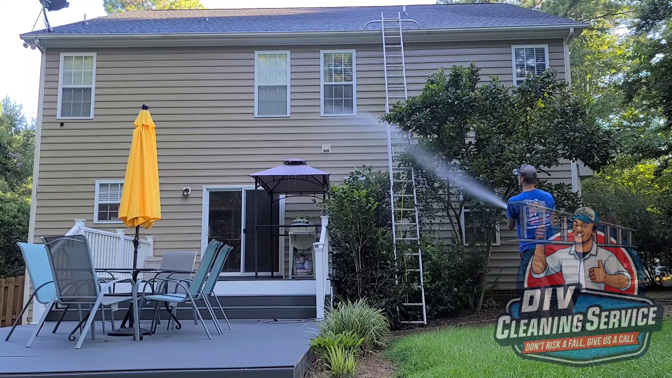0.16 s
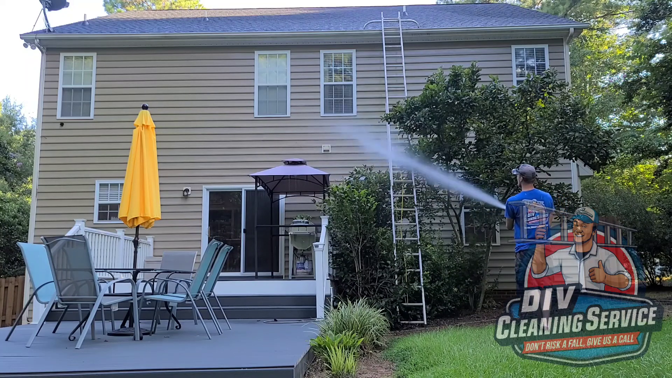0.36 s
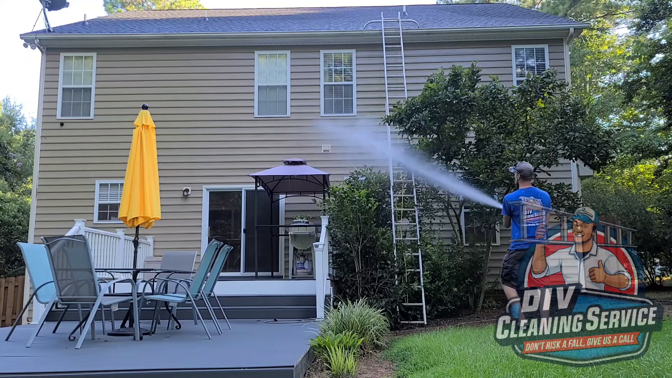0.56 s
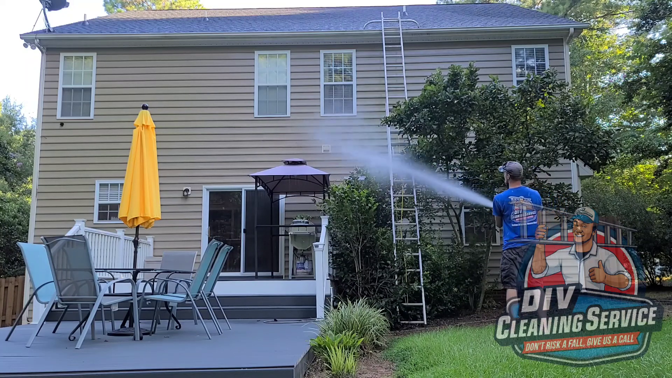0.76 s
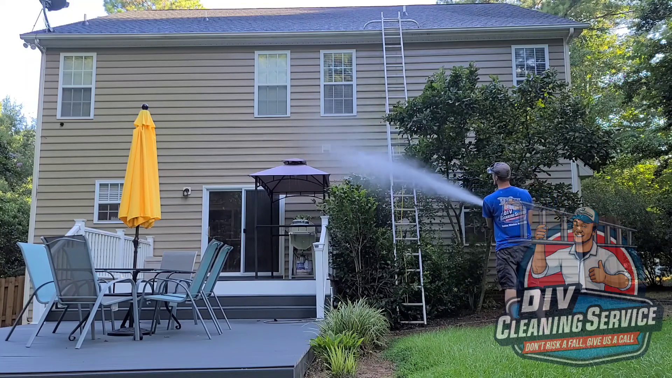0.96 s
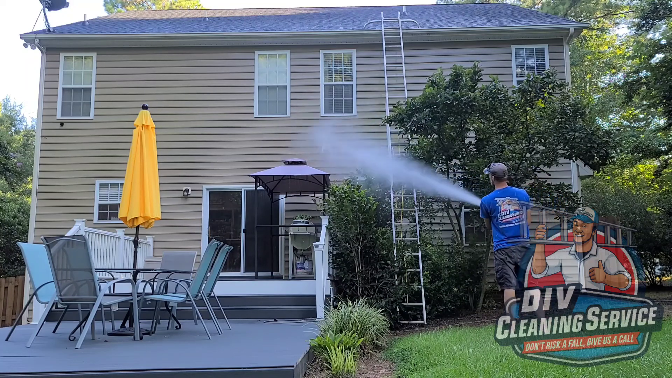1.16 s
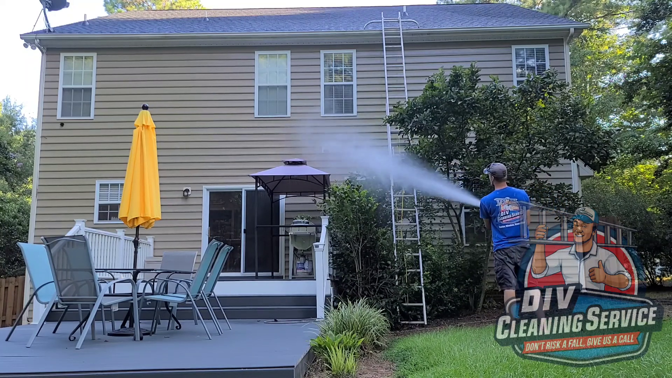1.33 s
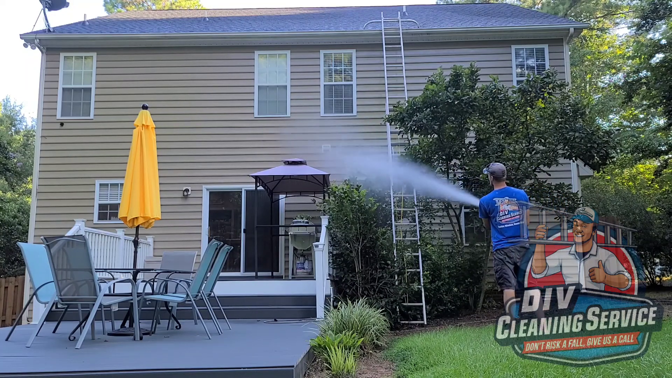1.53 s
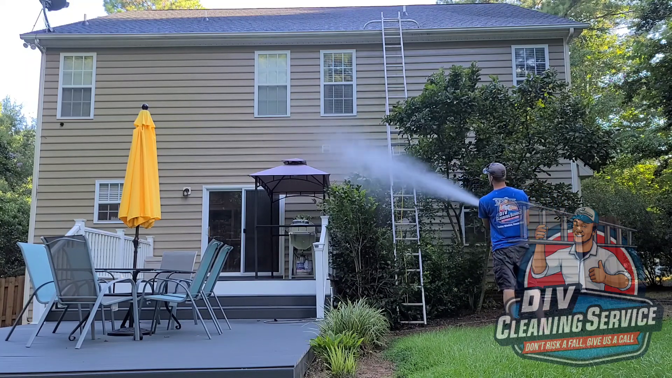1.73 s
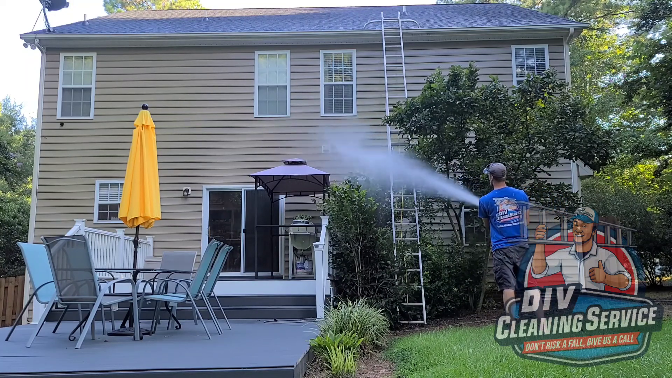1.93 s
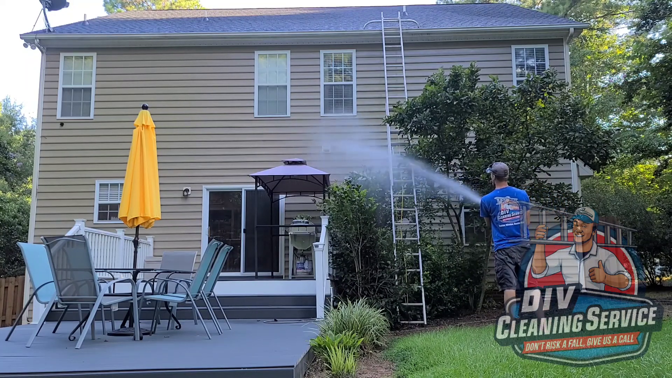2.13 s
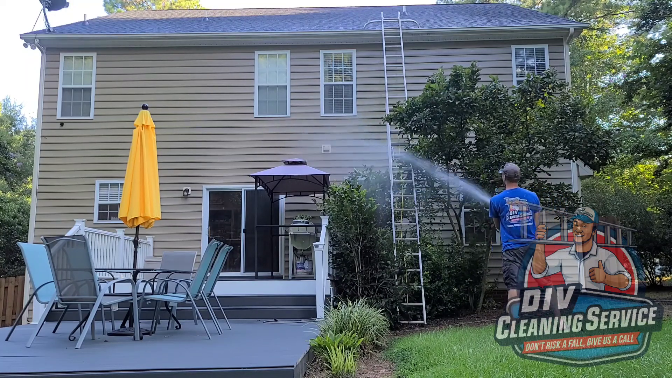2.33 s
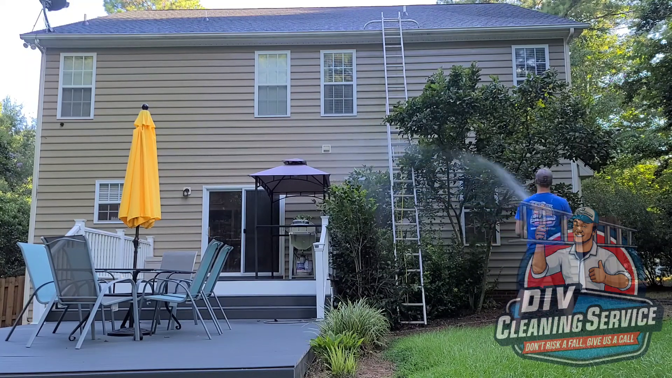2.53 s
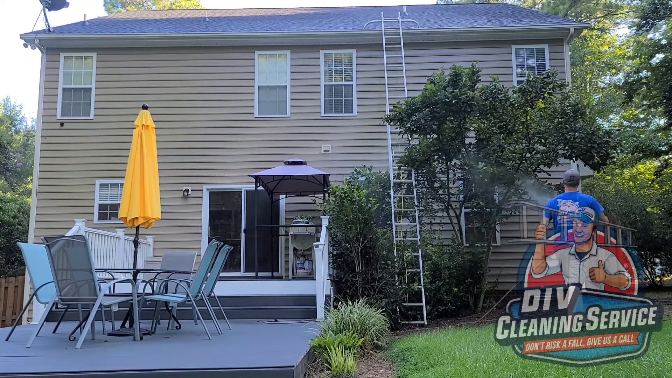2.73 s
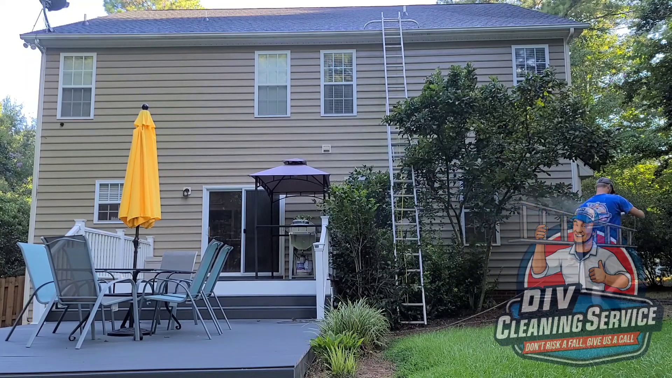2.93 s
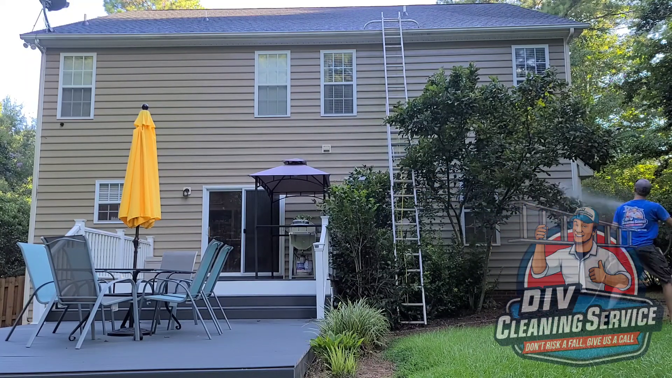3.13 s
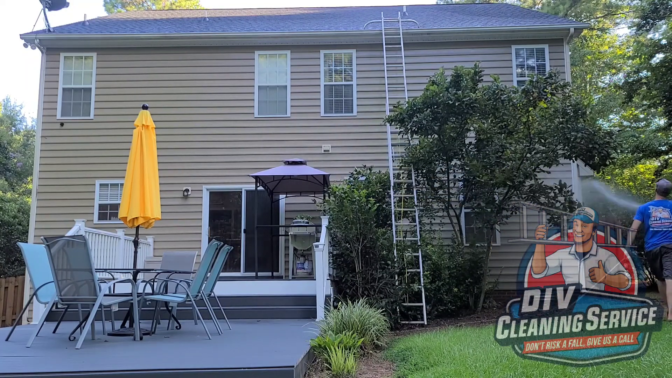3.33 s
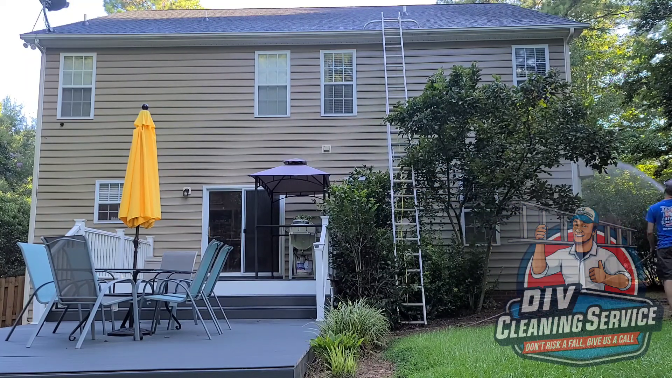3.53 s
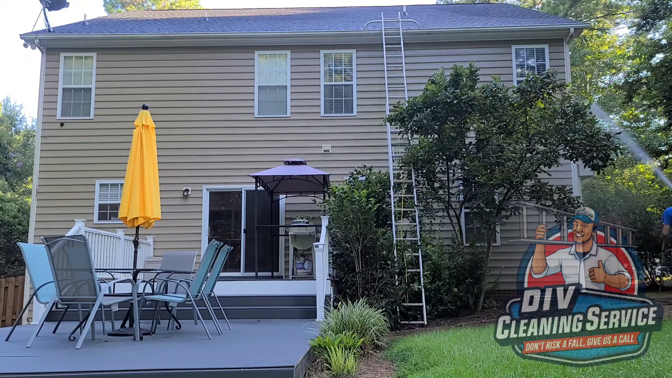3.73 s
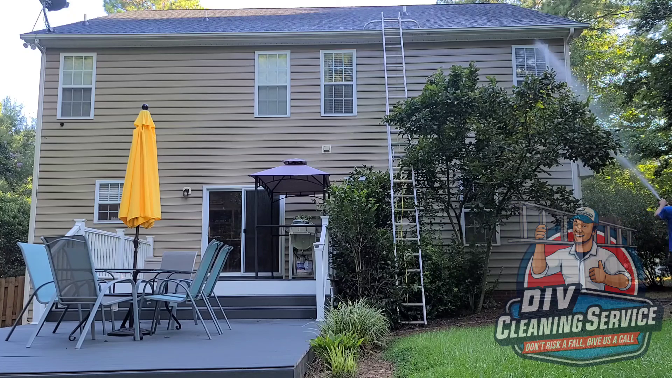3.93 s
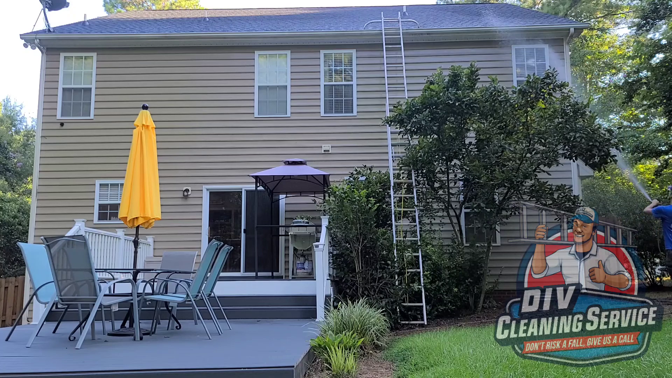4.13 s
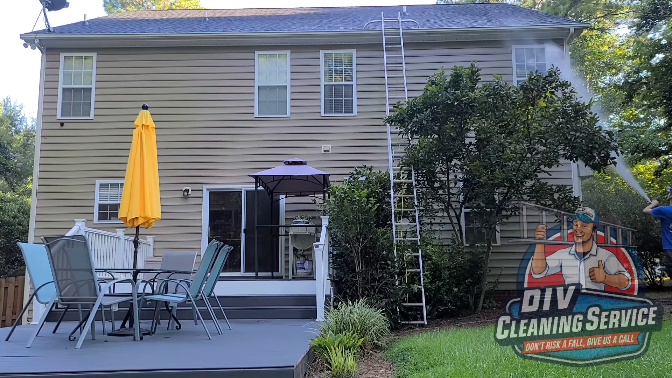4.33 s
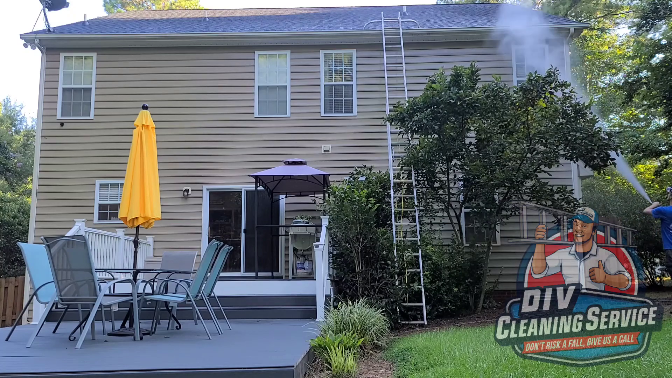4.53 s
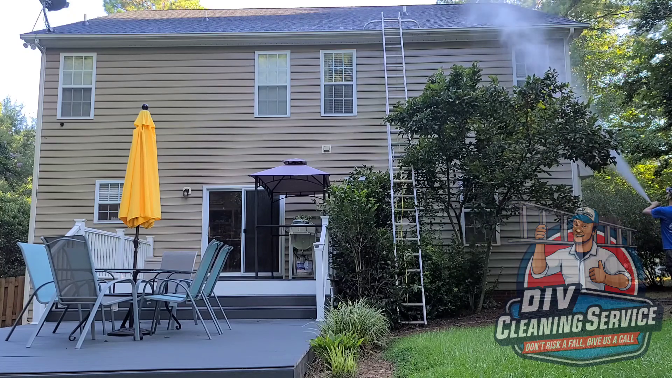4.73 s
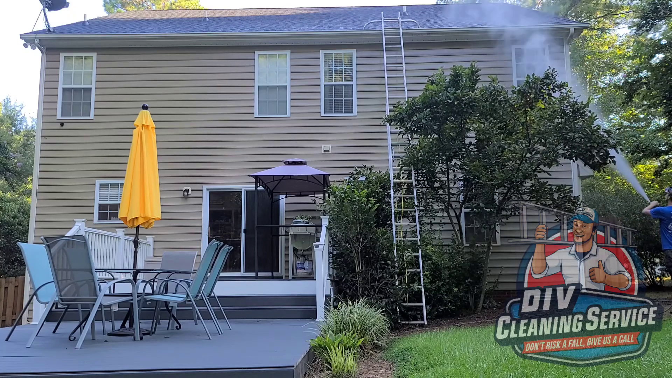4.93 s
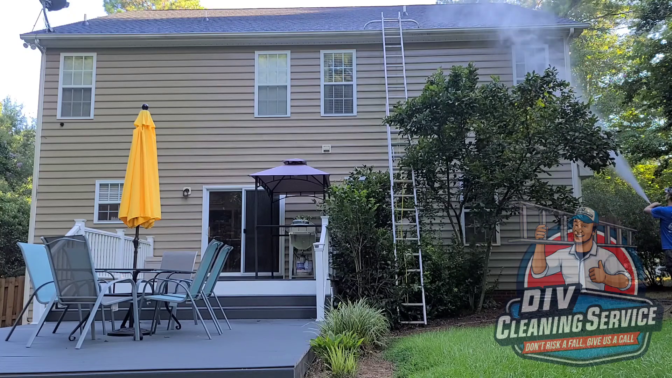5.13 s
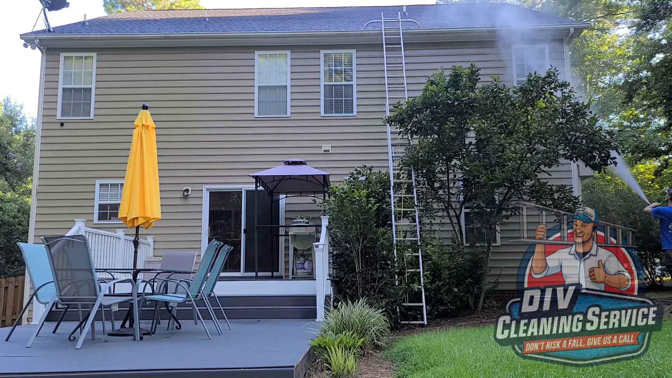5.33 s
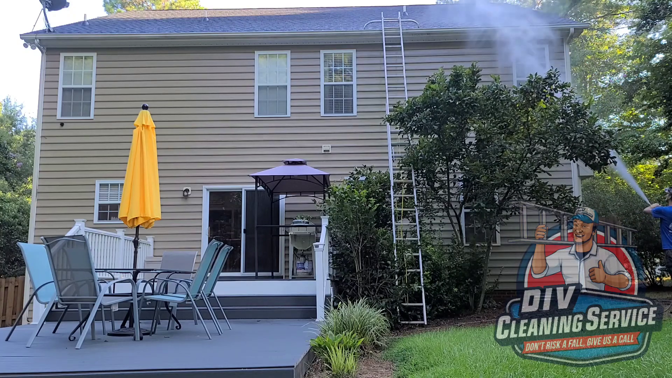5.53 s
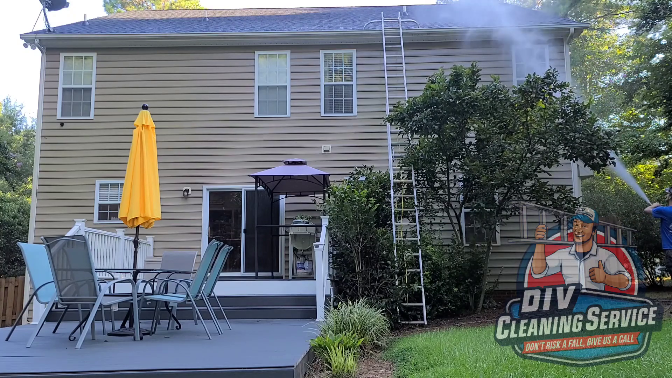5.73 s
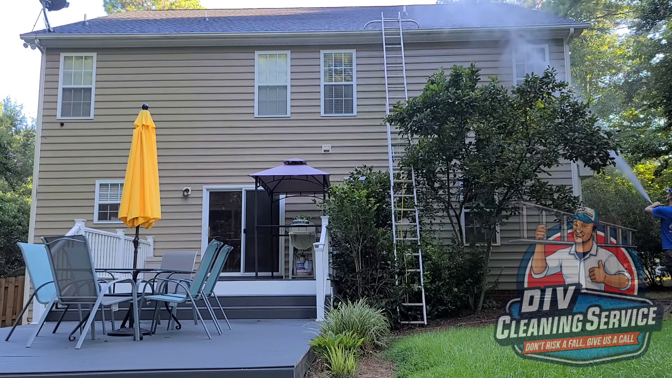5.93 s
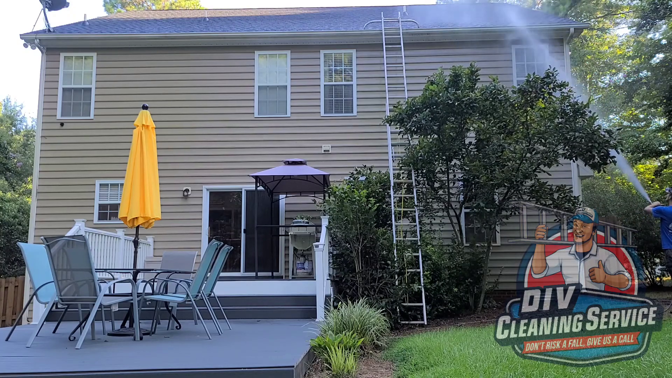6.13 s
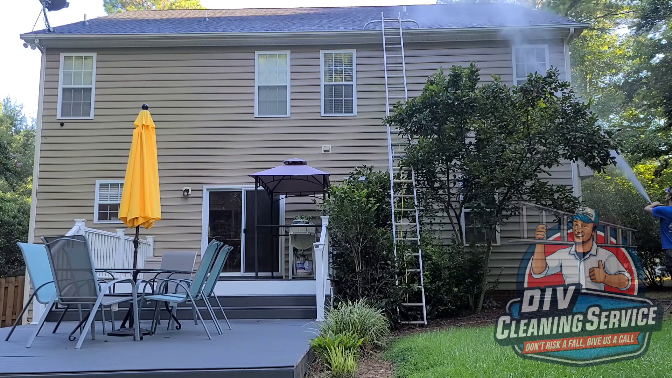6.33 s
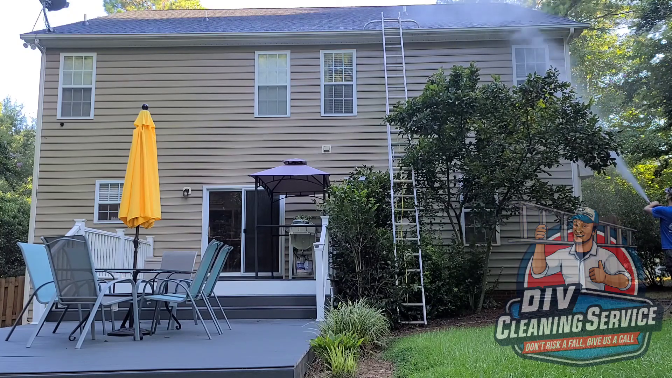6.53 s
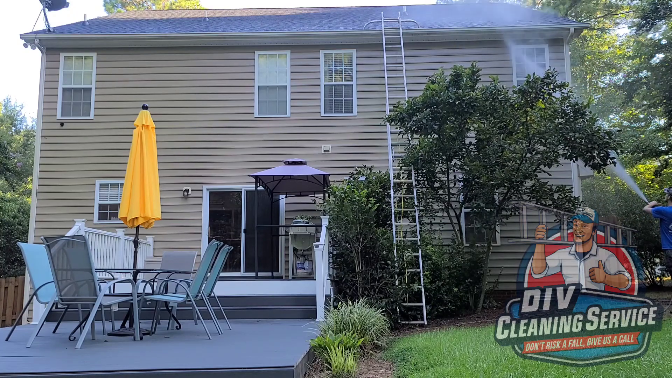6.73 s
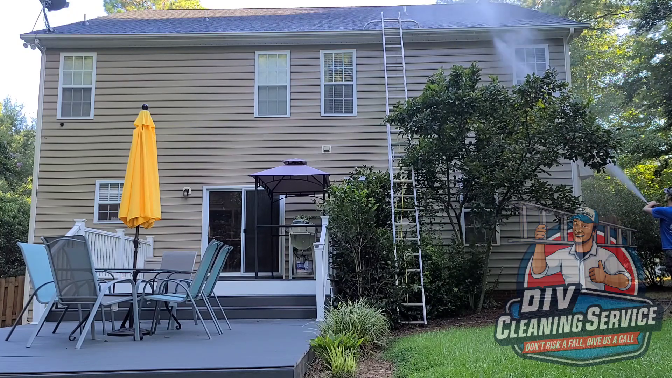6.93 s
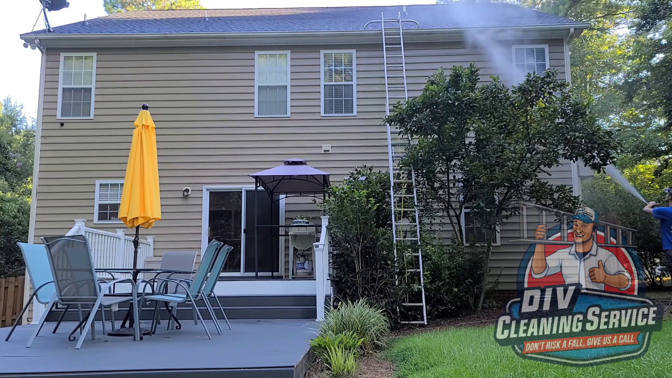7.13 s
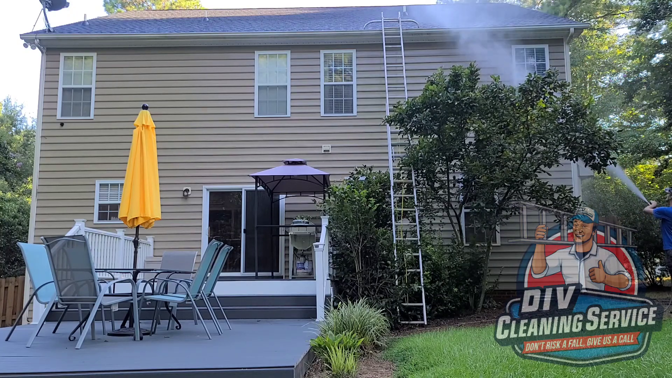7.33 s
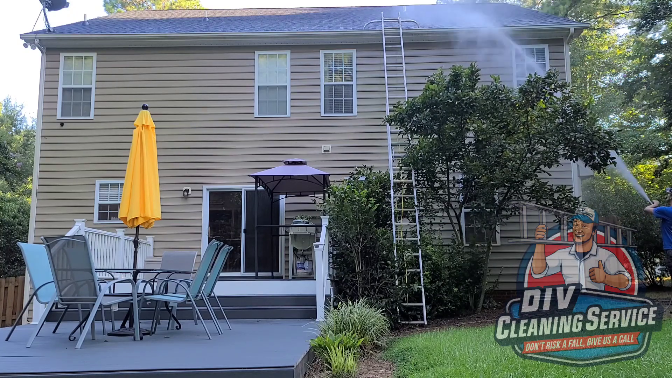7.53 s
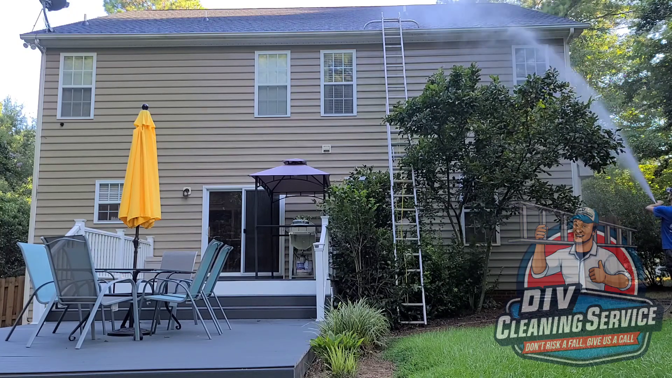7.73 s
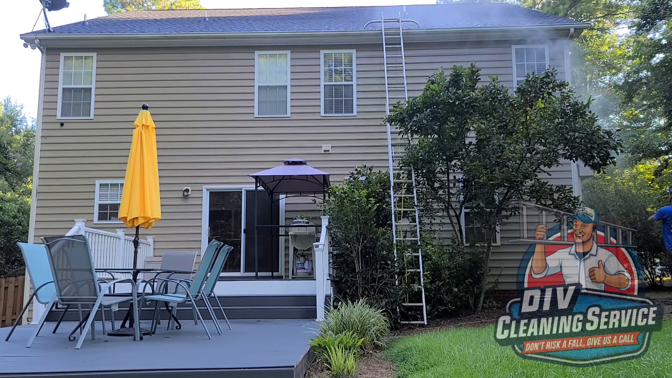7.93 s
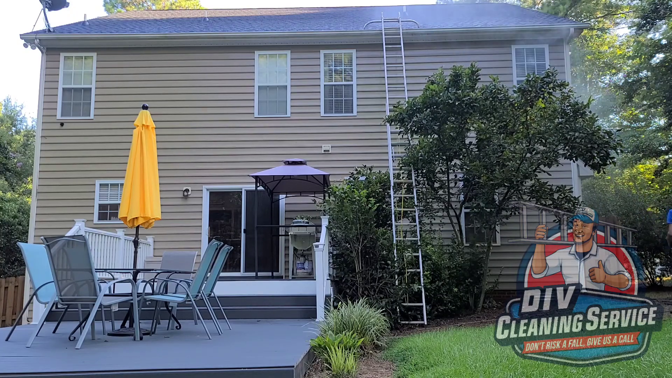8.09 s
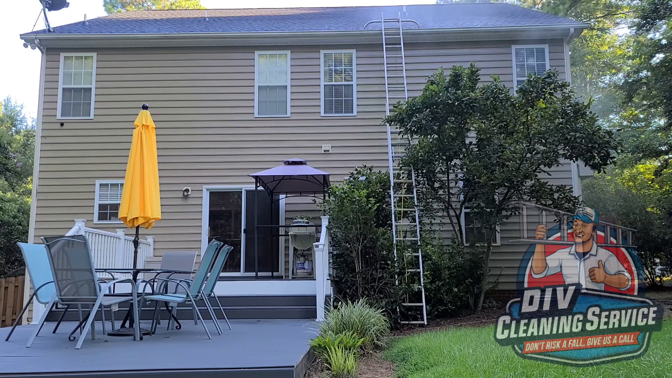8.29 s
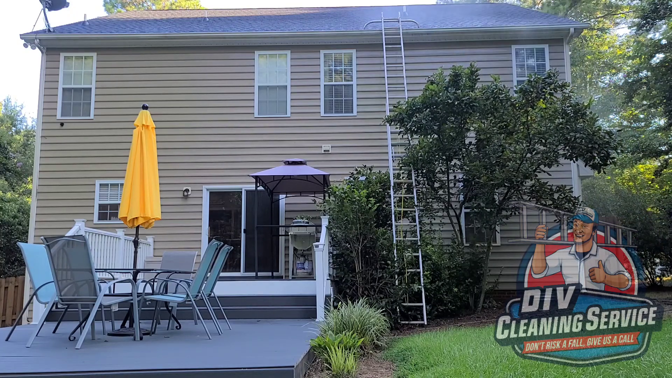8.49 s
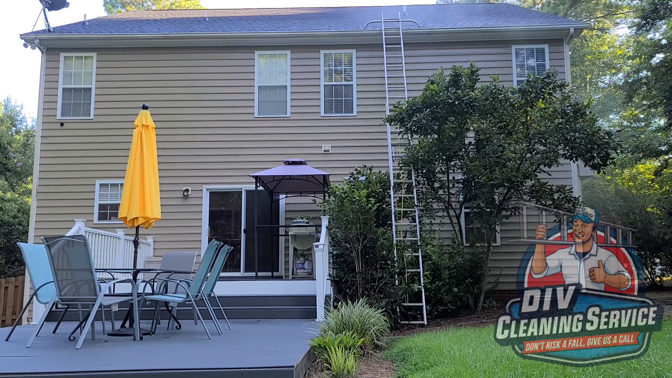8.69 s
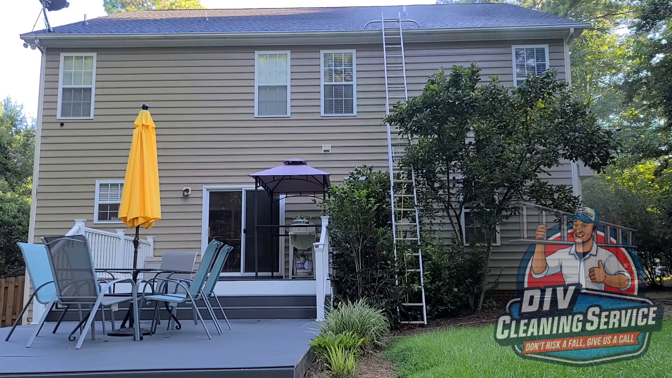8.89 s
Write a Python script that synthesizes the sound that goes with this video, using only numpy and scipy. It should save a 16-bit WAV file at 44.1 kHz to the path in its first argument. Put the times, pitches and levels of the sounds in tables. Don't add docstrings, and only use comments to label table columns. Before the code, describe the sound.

An open backyard, heard by a fixed small stereo camera several metres away. From 0 s a pressure washer jet rushes against house siding: wide-band watery roar, boxy board drumming, hollow splash and fine hiss, with quick fluttering. It brightens and swells around 1.1 to 2 s, then falls sharply. From 2.1 to 4 s the weaker stream comes in short uneven swishes through foliage while the source moves right. At about 4.3 s it surges to its loudest, booming and hissing at the gutter, dips near 4.9 s, swells again around 5.4 s, then holds slightly softer from 5.7 s. At 7.8 s it cuts off abruptly with a short dull yard echo. A low wavering engine drone, distant rumble and passing hums lie beneath throughout. The quiet ending reveals faint shrill insects, light patter and tiny drop ticks near 8.1, 8.3 and 8.7 s.

```python
import sys
import numpy as np
from scipy import signal
from scipy.fft import rfft, irfft, next_fast_len
from scipy.io import wavfile
from scipy.ndimage import uniform_filter1d, map_coordinates

SR = 44100
rng = np.random.default_rng(int(sys.argv[2]) if len(sys.argv) > 2 else 0)


def magnitude_from_level(level_db):
    exponent = np.asarray(level_db, float) / 20
    return 10 ** exponent


def digitize_waveform(pressure):
    field = np.atleast_2d(pressure).T
    bounded = np.clip(field, -1, 1)
    quanta = np.round(bounded * 32767).astype(np.int16)
    wavfile.write(sys.argv[1], SR, quanta)


N = 399310


def curves(rows, s):
    t, *cols = np.transpose(rows)
    return [np.interp(s, t, c) for c in cols]


def bumps(rows, s):
    mid, half, *cols = np.transpose(rows)
    bell = np.exp(-((s[:, None] - mid) / half) ** 2)
    return [bell @ c for c in cols]


def along(points, hz):
    f, *cols = np.transpose(points)
    return np.array([np.interp(np.log(hz + 1), np.log(f), c) for c in cols])


def unit(x):
    return x / np.sqrt(np.mean(np.abs(x) ** 2))


def wobble(rate_hz, s):
    knots = rng.standard_normal(int(N * rate_hz / SR) + 8)
    return map_coordinates(knots, [s * rate_hz])


def layer(colour, hz, level_db):
    shape = magnitude_from_level(along(colour, hz)) ** 2
    return (shape / shape.mean())[:, :, None] * magnitude_from_level(level_db) ** 2


FRAME, HOP = 512, 256
# pitch_hz, ahead_rad, far_right_rad
TRAIL = [(20, -1.5, 0.5), (467, 0.6, -0.7), (980, 0, 1.5), (1920, 1.0, 2.5), (2340, 0.5, 2.5), (2840, 2, 4),
         (4400, 4, 5.4), (5050, 3, 7), (6170, 4, 9.5), (7700, 5, 10.5), (10560, 8, 17), (10500, 10, 13),
         (12700, 12.5, 19), (16000, 7, 21.5)]


def ports(power, alike, place, patchy_db, spatter_db=0.):
    s = np.arange(N) / SR
    white = rng.standard_normal((3, N)) * magnitude_from_level(spatter_db * wobble(700, s))
    hz, s, (both, left, right) = signal.stft(white, SR, nperseg=FRAME, noverlap=FRAME - HOP)
    aside, scatter = place(s)
    near, far = np.clip(along(alike, hz), .01, 1)[:, :, None]
    reach = np.clip(hz[:, None] / 2500, 0, 1) ** 2
    share = near + np.clip(aside, 0, 1) * (far - near)
    share = share ** (1 + reach * (scatter - 1))
    ahead, far_right = along(TRAIL, hz)[:, :, None]
    late = np.exp(-1j * (ahead + aside * (far_right - ahead)))
    common = np.sqrt(share) * np.array([both * late, both])
    pair = common + np.sqrt(1 - share) * np.array([left, right])
    field = uniform_filter1d(rng.standard_normal(both.shape), size=5, axis=0)
    field = uniform_filter1d(field, size=12, axis=1)
    gain = np.sqrt(power(hz, s)) * magnitude_from_level(patchy_db * unit(field))
    out = signal.istft(pair * gain, SR, nperseg=FRAME, noverlap=FRAME - HOP)[1]
    return out[:, :N] / white.std()


WALK_FROM_S, WALK_TO_S = 2.13, 3.45


def walk(s):
    return np.sin(np.pi / 2 * np.clip((s - WALK_FROM_S) / (WALK_TO_S - WALK_FROM_S), 0, 1))


MEAN_FORCE_DB, MEAN_NOZZLE_DB = -31, -38
# start_s, wall_force_db, nozzle_db, target_hardness_db
STREAM = [(0, -33.5, -46, -3), (.22, -35.5, -45, -3), (.42, -31.5, -39.5, 0.5), (.82, -32.5, -39, 3.5),
          (1.1, -27.5, -33.5, 2.5), (1.9, -27.5, -33.5, 1), (2.07, -35, -42, 8), (2.16, -42, -51.5, -1),
          (2.75, -37.5, -47, -5), (4.13, -39, -46.5, -2.5), (4.2, -35, -40.5, -1), (4.29, -28.5, -32, 0),
          (4.4, -22, -28.5, -4.5), (4.62, -23, -27.5, -2), (4.87, -29.5, -29, 0), (5.38, -24, -29.5, -3.5),
          (5.68, -30, -37.5, -2.5), (7.76, -32.5, -37, 1.5)]
# mid_s, half_length_s, on_wall_db, in_air_db
SPURTS = [(1.59, .05, 0, -0.5), (2.35, .05, 1.5, 3), (2.5, 0.14, 4.5, -3.5), (2.9, 0.055, 0, 2),
          (6.8, 0.083, 0.5, 0), (5.1, 0.13, 0.5, 0.5), (.1, 0.038, 0.5, -1), (.7, 0.12, 1, 0),
          (1.0, 0.07, 0, 1), (2.66, 0.09, 0, 3.5), (3.0, .05, 2.5, 4.5), (3.17, 0.049, 1.5, 3.5),
          (3.27, 0.051, -0.5, -1), (3.4, .05, 1.5, -2.5), (3.55, 0.1, 2, -2), (3.69, 0.049, 1.5, -2),
          (3.84, .05, 1, 0.5), (3.93, 0.059, 1, -0.5), (4.93, 0.068, 1.5, 0.5), (5.37, 0.06, 2.5, 1.5),
          (5.54, 0.1, 1.5, 1), (4.22, 0.037, 0.5, 1.5), (6.32, 0.11, -1, -0.5), (7.08, .05, 0.5, 0)]


def stream(s):
    return curves(STREAM, s) + bumps(SPURTS, s)


SCATTER, SCATTER_PER_DB, SCATTER_LEAST, SCATTER_FAR = 1, -0.05, .55, 0


def place(s):
    nozzle = stream(s)[1]
    weak = np.maximum(SCATTER + SCATTER_PER_DB * (nozzle - MEAN_NOZZLE_DB), SCATTER_LEAST)
    return walk(s), weak + SCATTER_FAR * walk(s)


DRUM_DB, DRUM_GROWS, DRUM_WITH_NOZZLE = -46, 1, 0
DRUM_FAR_DB, DRUM_SPURTS = -1.5, 0.46
DRUM_FULL_DB = 3
# pitch_hz, left_db, right_db
DRUM = [(120, -40, -46), (220, -12, -7.5), (362, 2.5, 2), (464, -0.5, 0), (700, -5, -6), (1035, 5, 4),
        (1340, -41, -38)]


def boards(s):
    force, nozzle, _, on_wall, _ = stream(s)
    level_db = DRUM_DB + DRUM_GROWS * np.minimum(force + on_wall - MEAN_FORCE_DB, DRUM_FULL_DB)
    level_db = level_db + DRUM_WITH_NOZZLE * (nozzle - MEAN_NOZZLE_DB)
    level_db = level_db + DRUM_SPURTS * on_wall + DRUM_FAR_DB * walk(s)
    return [(DRUM, level_db + 3.2)]


HOLLOW_DB, HOLLOW_GROWS, HOLLOW_FAR_DB, HOLLOW_SPURTS = -37.5, 0.55, -1, 1.
# pitch_hz, left_db, right_db
HOLLOW = [(800, -56, -56), (1037, -12, -11), (1135, 0.5, 1), (1300, 3.5, 1.5), (1710, -0.5, 2),
          (2110, -18.5, -18)]


def hollow_splash(s):
    force, _, _, on_wall, _ = stream(s)
    level_db = HOLLOW_DB + HOLLOW_GROWS * (force - MEAN_FORCE_DB)
    level_db = level_db + HOLLOW_SPURTS * on_wall + HOLLOW_FAR_DB * walk(s)
    return [(HOLLOW, level_db + 2.4)]


# pitch_hz, left_db, right_db
ROAR = [(1200, -40, -40), (1500, -8, -8), (1700, -5, -5), (1850, 0, 1), (2020, 0, 1), (2150, -6, -6),
        (2500, -10, -11), (3000, -40, -40)]
# pitch_hz, left_db, right_db
UPPER = [(1920, -44, -36), (2290, -7.5, -7), (2720, -1.5, -4.5), (2880, 0, -4), (3350, -3.5, -4.5),
         (3710, -10, -12), (4700, -30, -38)]
# pitch_hz, left_db, right_db
UPPER_AHEAD = [(1940, -40, -32), (2270, -6, -6), (2600, -0.5, -8), (2830, 1.5, -3.5), (3080, -4.5, -2),
               (3370, -8, -9), (4040, -33, -42)]


def impact_roar(s):
    force, _, hard, on_wall, _ = stream(s)
    roar = force + on_wall
    upper = roar - 4 + hard
    upper_far = upper + 10 * np.log10(walk(s) + 1e-3)
    upper_near = upper + 10 * np.log10(1.001 - walk(s))
    return [(ROAR, roar - 1.5), (UPPER, upper_far), (UPPER_AHEAD, upper_near)]


# pitch_hz, left_db, right_db
HISS = [(2700, -23, -56), (3630, 3.5, 0.5), (4370, 2, -1.5), (4720, 2, -1), (6150, -1.5, -11),
        (7120, -4.5, -3.5), (9000, -25, -21.5)]


def nozzle_hiss(s):
    _, nozzle, _, _, in_air = stream(s)
    return [(HISS, nozzle + in_air + 0.96)]


MIST_DB, MIST_GROWS, MIST_FAR_DB, MIST_SPURTS = -41, 1.28, 1.5, 1
MIST_SWING_S = 0.047
# pitch_hz, left_db, right_db
MIST = [(6000, -30, -30), (7150, -2, -1.5), (8660, 3.5, 4), (10450, -7.5, 0.5), (11100, 2, 3),
        (12900, -5, -2), (14300, 1, 2.5), (15600, 4, 5), (20000, 2.5, 2.5)]


def mist_spray(s):
    _, nozzle, _, _, in_air = stream(s)
    level_db = MIST_DB + MIST_GROWS * (nozzle + in_air - MEAN_NOZZLE_DB)
    level_db = level_db + MIST_SPURTS * in_air + MIST_FAR_DB * walk(s)
    level_db = level_db - MIST_SWING_S * np.abs(np.gradient(nozzle, s))
    return [(MIST, level_db + 1.0)]


def yard_echo(direct, hz, s):
    decay = magnitude_from_level(-60 * s[:180] / 1.7) ** 2
    dull = 1 / (1 + (hz[:, None] / 3000) ** 2)
    tail = signal.fftconvolve(direct, (decay / decay.sum())[None, None], axes=2)
    return magnitude_from_level(-17.5) ** 2 * dull * tail[..., :len(s)].clip(0)


SHUT_S, SHUT_DB_PER_S = 7.773, 520
# start_s, pitch_hz, level_db
JET_DIP = [
    (4.3, 2750, 0),
    (4.5, 2600, -9),
    (4.75, 2550, -10),
    (5.0, 2250, -10),
    (5.25, 2250, -8),
    (5.45, 2400, 0),
]
# pitch_hz, ahead_share, far_right_share
JET_ALIKE = [(200, 1, 1), (650, 0.82, 0.72), (1300, 0.47, 0.73), (1960, 0.8, 0.89), (2370, 0.35, 0.42),
             (2930, 0.9, 0.5), (3720, 0.1, 0.28), (4970, .3, 0.3), (7000, 0.13, 0.5), (8760, 0.23, 0.07),
             (9700, .15, 0.3), (10250, 0.4, 0.6), (11190, 0.2, 0.07), (12800, .08, 0.6), (14000, 0.5, 0.45)]


def jet():
    def power(hz, s):
        _, nozzle, _, _, in_air = stream(s)
        hiss = nozzle + in_air
        mist = mist_spray(s)
        flutter = 0.18 * wobble(11, s) + 0.29 * wobble(60, s)
        shut = -SHUT_DB_PER_S * np.clip(s - SHUT_S, 0, 1)
        parts = boards(s) + hollow_splash(s) + impact_roar(s) + nozzle_hiss(s) + mist
        direct = sum(layer(colour, hz, db + shut + flutter + 0.13 * wobble(13, s)) for colour, db in parts)
        presence = np.exp(-((hz[:, None] - 6500) / 1800) ** 2) * 1.08 * np.clip(hiss + 34, -3, 8)
        finest = np.clip((hz[:, None] - 11500) / 4000, 0, 1) * -.3 * (mist[0][1] + 37)
        finest = finest * (0.34 + 0.83 * walk(s + .5))
        dip_hz, dip_db = curves(JET_DIP, s)
        dip = dip_db * np.exp(-((hz[:, None] - dip_hz) / 110) ** 2)
        direct = direct * magnitude_from_level(presence + finest + dip)
        return direct + yard_echo(direct, hz, s)
    return ports(power, JET_ALIKE, place, patchy_db=.8, spatter_db=1.15)


# pitch_hz, ahead_share, far_right_share
FAR_ALIKE = [(60, .99, .99), (130, .965, .965), (290, .9, .9), (640, .22, .22), (1400, .42, .42),
             (2200, .06, .06), (15000, .03, .03)]
DRIP_OFF_DB, DRIP_OFF_S, CALM_DB = 3.5, 0.72, -52.5
# pitch_hz, left_db, right_db
GARDEN = [(200, -6, -27), (386, -7, -5.5), (670, -16, -14), (1305, -12, -12), (1970, -9, -9.5),
          (3000, -11, -14.5), (4500, -16.5, -17), (6000, -20, -31), (8510, -29, -30), (10300, -39, -36),
          (13020, -32, -23), (15500, -30, -31)]
# pitch_hz, left_db, right_db
INSECTS = [(6000, -32, -32), (6400, -17, -18), (6620, -5, -6), (7000, 0, 0), (7300, -5, -3),
           (7700, -15, -11), (8500, -32, -27)]


def garden():
    def power(hz, s):
        drip = DRIP_OFF_DB * np.exp(-np.clip(s - SHUT_S, 0, 9) / DRIP_OFF_S)
        calm = layer(GARDEN, hz, CALM_DB + drip + 0.3 * wobble(1.93, s))
        buzz_db = -55.5 + .3 * wobble(2.5, s) + 1.5 * wobble(90, s)
        return calm + layer(INSECTS, hz, buzz_db)

    def all_round(s):
        return np.ones_like(s), np.ones_like(s)
    return ports(power, FAR_ALIKE, all_round, patchy_db=1.1)


def hum(hz, level_db, s):
    return np.sqrt(2) * magnitude_from_level(level_db) * np.sin(2 * np.pi * np.cumsum(hz) / SR)


# start_s, pitch_hz, level_db
ENGINE = [(0, 54, -38), (1.6, 56.44, -38.5), (2, 51.63, -37), (2.9, 54.2, -39), (3.8, 54, -42),
          (4.3, 58.94, -39), (5.1, 53.26, -36.5), (6, 56.5, -45), (6.7, 56.9, -39), (7, 53.5, -40.5),
          (7.8, 52.4, -41), (8.3, 58.84, -35.5), (9.05, 57.4, -37.5)]
# mid_s, half_length_s, level_db
MISFIRES = [
    (.78, .06, -8),
    (1.86, 0.042, -8),
    (2.2, 0.086, -3),
    (2.97, 0.038, -4),
    (4.18, .04, 6),
    (4.36, .06, -2),
    (7.84, 0.072, -8),
    (8.01, 0.036, 8.5),
    (8.07, .03, -13),
]
# mid_s, pitch_hz, half_length_s, level_db
TRUCKS = [
    (1.45, 132, 0.45, -40.5),
    (1.447, 116, 0.1, -40),
    (3.3, 119, 0.4, -44),
    (3.86, 113, 0.19, -37),
    (4.291, 103, 0.11, -41),
]


def engine():
    s = np.arange(N) / SR
    hz, db = curves(ENGINE, s)
    level_db = db + bumps(MISFIRES, s)[0] - 2.5 + 1.5 * wobble(9, s)
    tone = hum(hz + 1.1 * wobble(12, s), level_db, s)
    for mid_s, hum_hz, half_s, hum_db in TRUCKS:
        swell = np.exp(-((s - mid_s) / half_s) ** 2)
        tone = tone + swell * hum(hum_hz + 1.02 * wobble(8, s), hum_db, s)
    return tone


RUMBLE_DB, RUMBLE_FADES_DB_PER_S, RUMBLE_LEAVES_S = -39.5, 3, 7.5
# pitch_hz, level_db
RUMBLE = [(18, -34), (35, -5), (47, -1.5), (56, -2), (68, -1), (90, -2.5), (120, -3), (160, -5),
          (200, -12.5), (260, -11.5), (310, -23), (450, -40.5)]
# mid_s, half_length_s, level_db
ROLLS = [
    (1.46, 0.035, 5),
    (3.95, .1, -1),
    (4.25, 0.058, 2.5),
    (4.5, .04, 5),
    (5.19, 0.047, 4),
    (5.25, .03, -3),
    (5.37, 0.045, 5),
    (5.44, 0.035, -5),
    (8.87, .08, -3),
]


def rumble():
    s = np.arange(N) / SR
    m = next_fast_len(N)
    f = np.fft.rfftfreq(m, 1 / SR)
    turn = np.arccos(np.clip(along(FAR_ALIKE, f)[0], 0, 1)) / 2
    mid, side = rfft(rng.standard_normal((2, m))) * [np.cos(turn), np.sin(turn)]
    noise = irfft(np.array([mid + side, mid - side]) * magnitude_from_level(along(RUMBLE, f)), m)[:, :N]
    fade_db = RUMBLE_FADES_DB_PER_S * np.clip(s - RUMBLE_LEAVES_S, 0, 9)
    return magnitude_from_level(RUMBLE_DB - fade_db + bumps(ROLLS, s)[0] + 2.0) * unit(noise)


# start_s, level_db, lowest_hz
DROPS = [
    (8.061, -45, 1500),
    (8.272, -50, 9000),
    (8.740, -44, 2500),
]


def drops():
    out = np.zeros((2, N))
    t = np.arange(600) / SR
    for s, db, low_hz in DROPS:
        tick = rng.standard_normal((2, len(t))) * np.exp(-((t - .004) / .0022) ** 2)
        high = signal.butter(2, low_hz, "high", fs=SR, output="sos")
        out[:, round((s - .004) * SR):][:, :len(t)] += magnitude_from_level(db) * signal.sosfilt(high, tick)
    return out


def scene():
    return jet() + garden() + engine() + rumble() + drops()


def top_cut(x):
    return signal.sosfilt(signal.butter(12, 16980, fs=SR, output="sos"), x)


TOP_HZ = 15760
SHIVER_SAMPLES, SHIVER_DEPTH, SHIVER_TURN_RAD = 1024, .115, -2.6


def record(dry):
    m = next_fast_len(N)
    hz = np.fft.rfftfreq(m, 1 / SR)
    whole = rfft(dry, m) * np.clip((TOP_HZ - hz) / 120 + .5, 0, 1)
    low = irfft(whole * (hz < 300), m)[:, :N]
    high = irfft(whole * (hz >= 300), m)[:, :N]
    shiver = 1 + SHIVER_DEPTH * np.cos(2 * np.pi * np.arange(N) / SHIVER_SAMPLES + SHIVER_TURN_RAD)
    return top_cut(low + high * shiver)


dry = scene()
out = record(dry)
digitize_waveform(out)
```